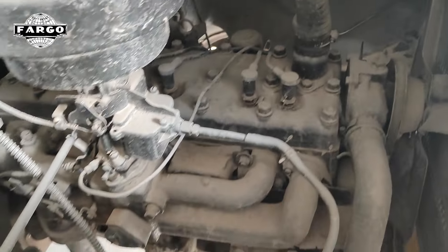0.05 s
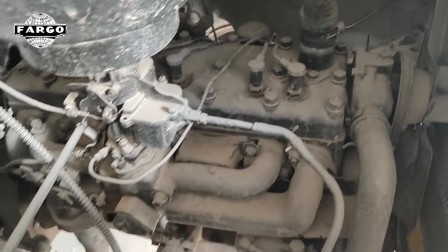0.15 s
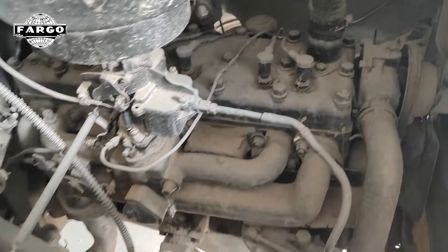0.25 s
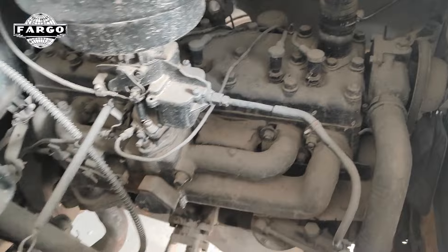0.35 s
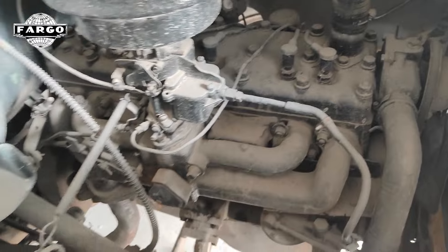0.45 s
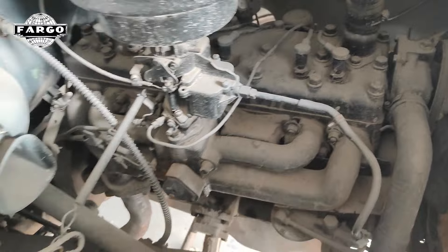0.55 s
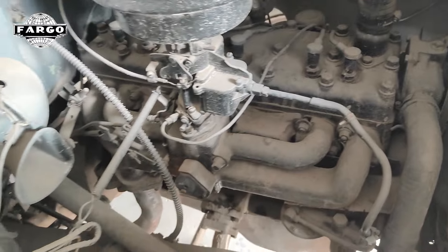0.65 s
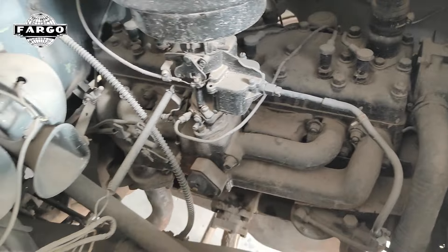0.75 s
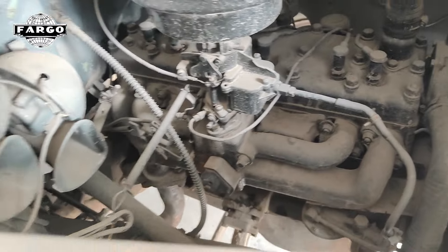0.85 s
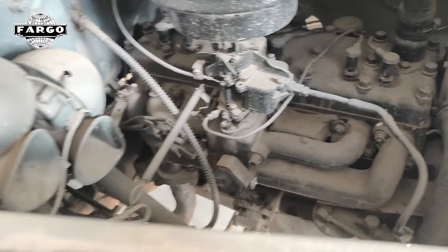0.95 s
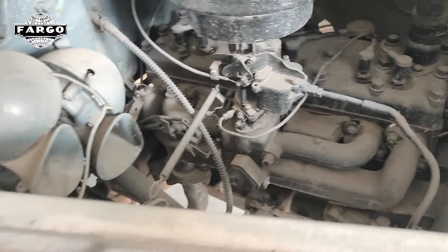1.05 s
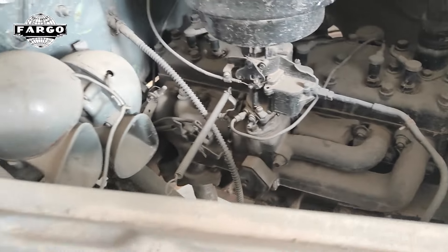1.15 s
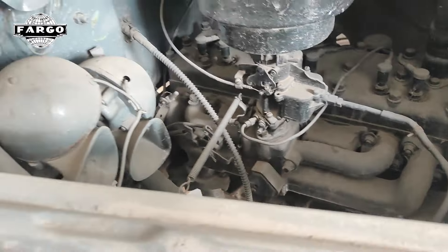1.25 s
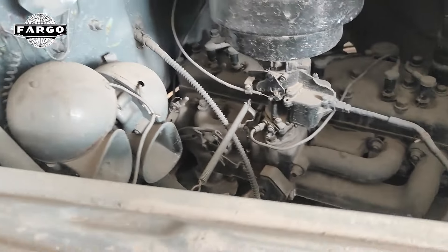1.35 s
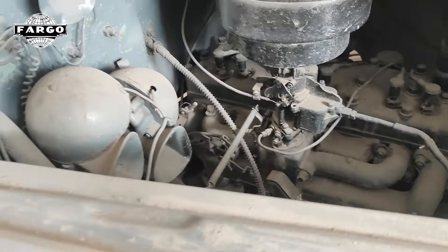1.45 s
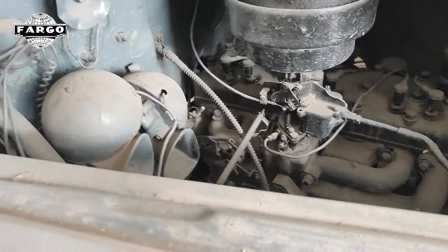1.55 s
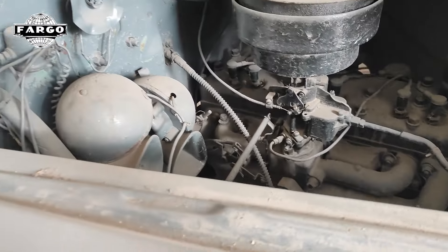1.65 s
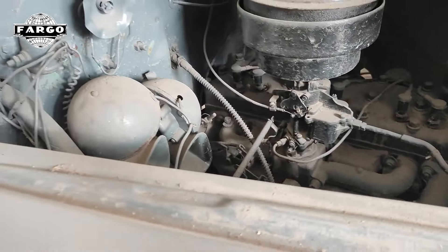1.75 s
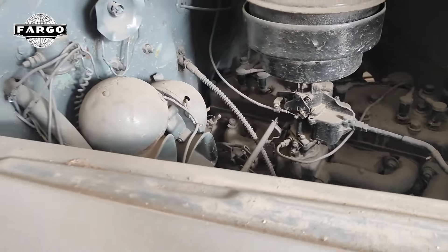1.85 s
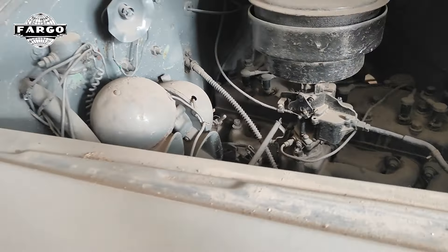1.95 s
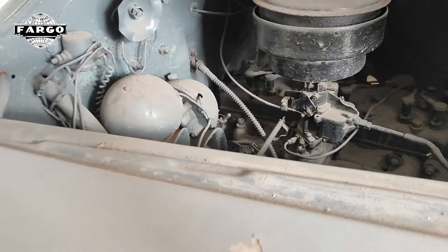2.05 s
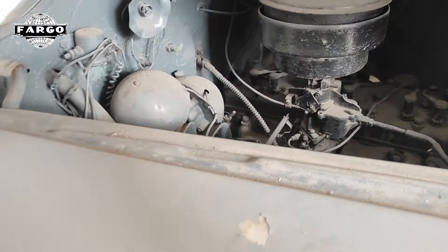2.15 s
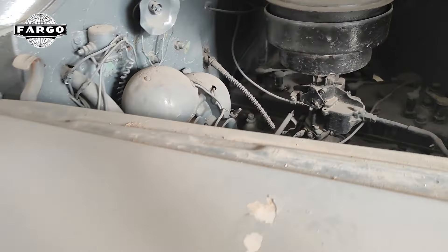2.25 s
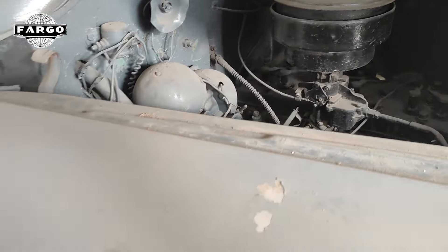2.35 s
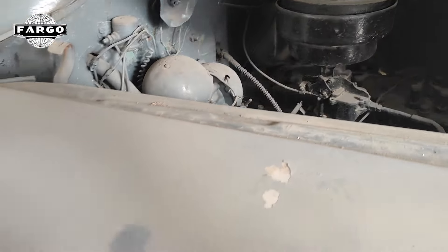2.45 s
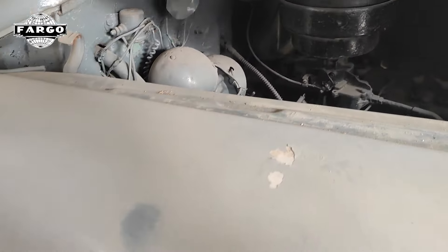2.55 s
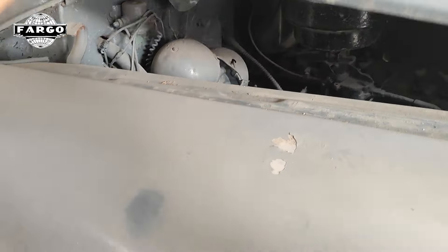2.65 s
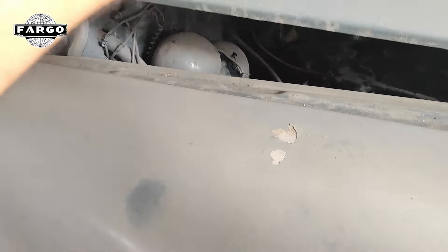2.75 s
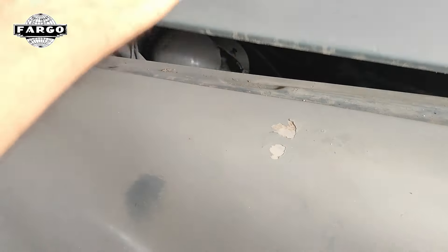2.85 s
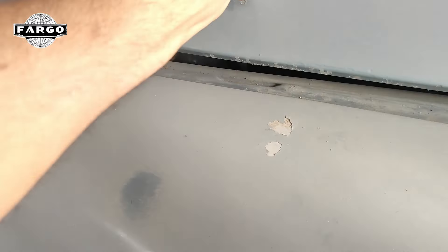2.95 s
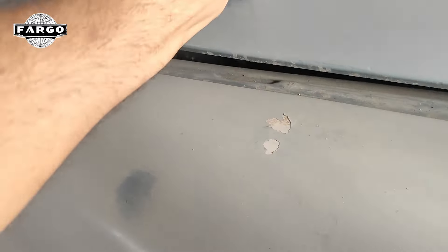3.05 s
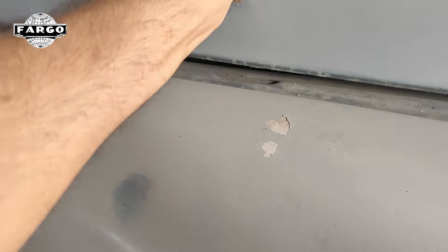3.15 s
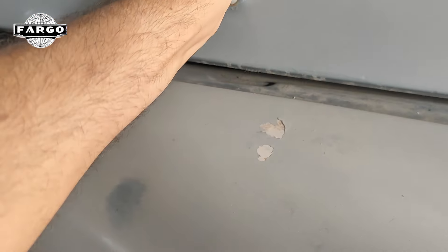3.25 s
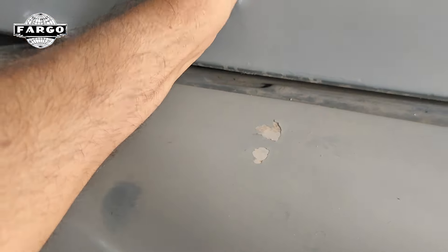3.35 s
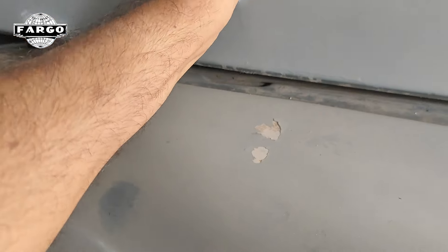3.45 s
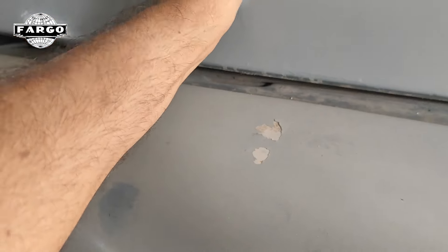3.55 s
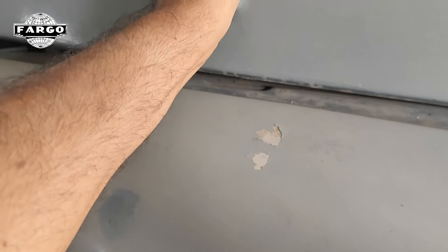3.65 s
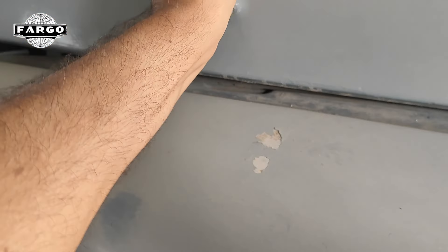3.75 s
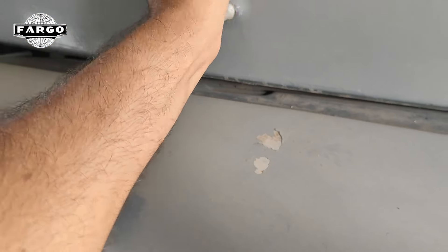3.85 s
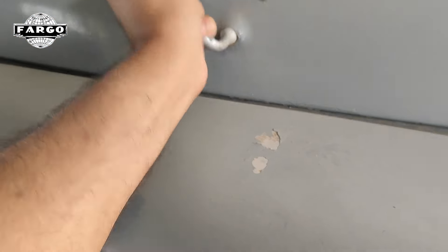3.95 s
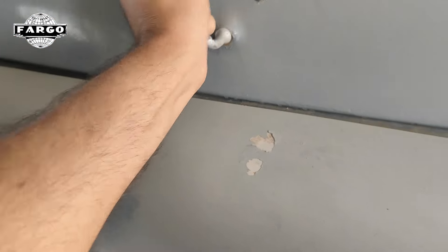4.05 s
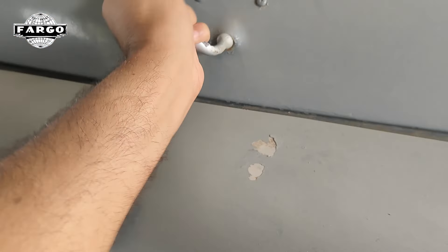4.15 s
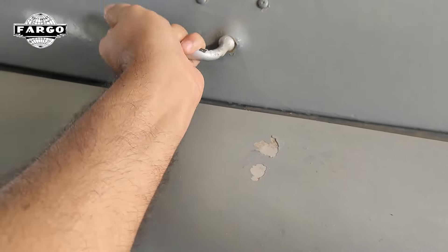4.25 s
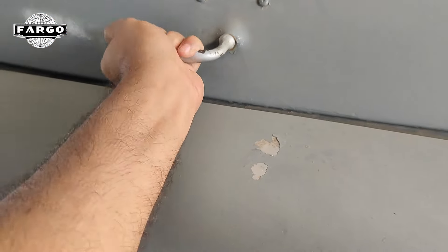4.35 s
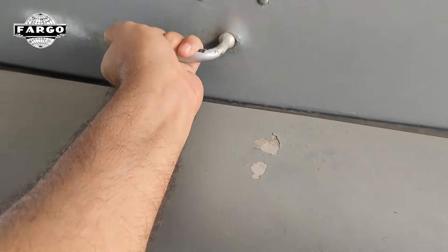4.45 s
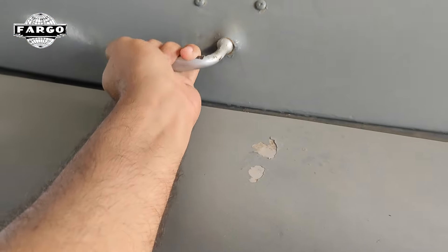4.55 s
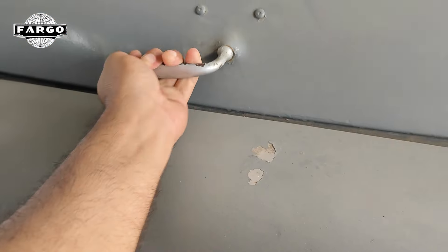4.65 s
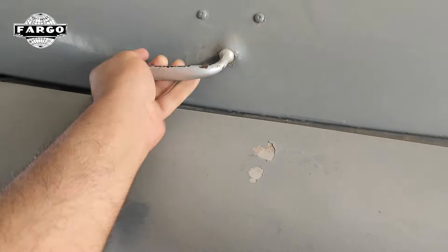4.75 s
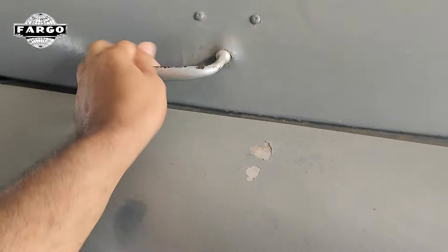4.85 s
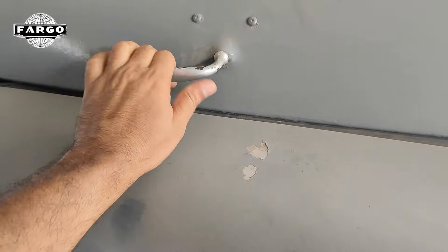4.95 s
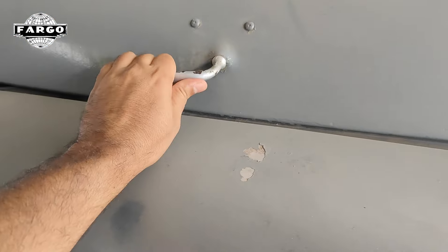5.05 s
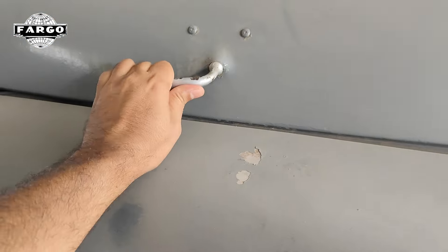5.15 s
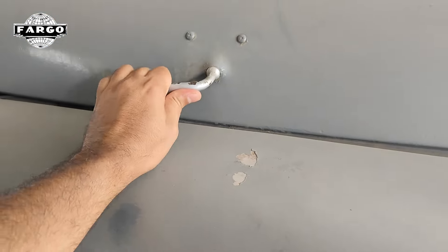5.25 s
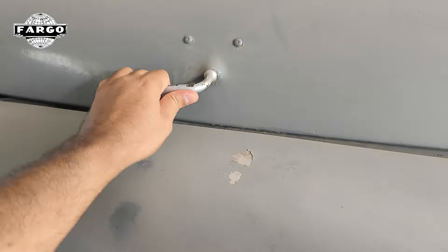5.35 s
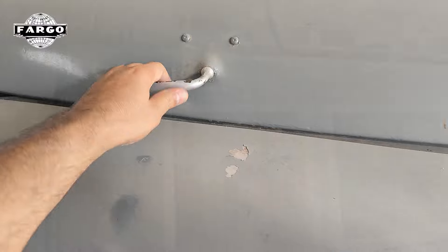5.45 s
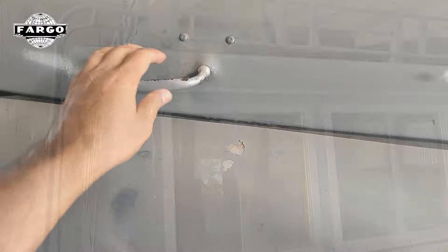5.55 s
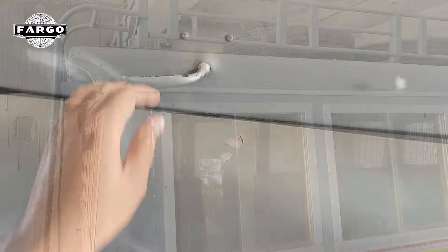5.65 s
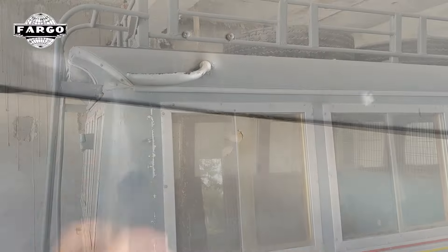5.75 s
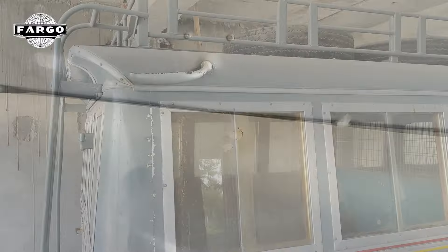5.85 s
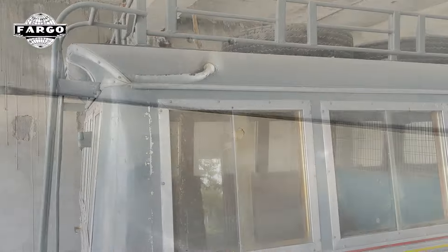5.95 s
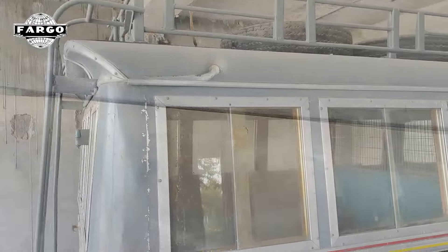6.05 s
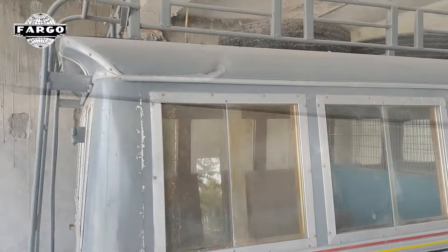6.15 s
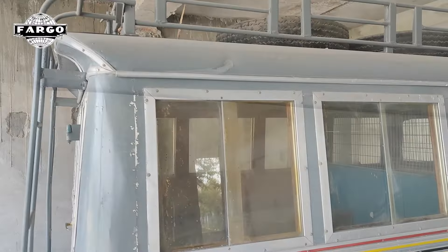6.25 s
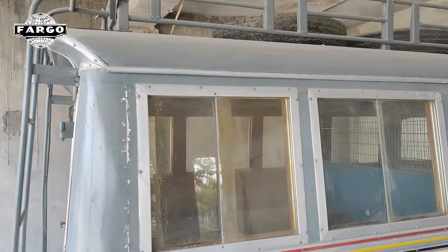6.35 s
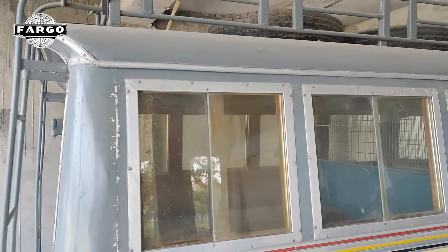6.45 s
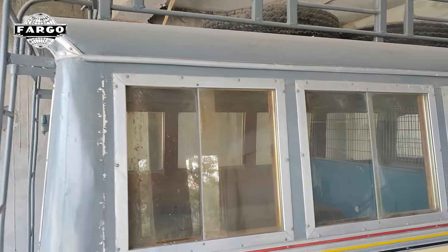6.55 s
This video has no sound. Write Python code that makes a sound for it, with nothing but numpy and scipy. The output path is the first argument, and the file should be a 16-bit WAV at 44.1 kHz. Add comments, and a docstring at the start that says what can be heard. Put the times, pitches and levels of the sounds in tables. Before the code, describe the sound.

Close stereo pickup of an old bus hood being shut by hand in an open yard. First, high wavering hinge squeaks over a distant low idle, then a short rough groan and scrape, a bright hard metal clash with hollow bonks, a pause, and a heavier slam with a deep panel boom. Small dull knocks come after the handle is released. The engine fades beneath thin far squeals, regular insect-like chirps and a faint twitter.

```python
"""An engine idles low some way off, as a few wavering harmonics under the shaped noise of an open yard.
Close by, two steel hood panels of an old bus are shut by hand. The side panel's dry hinge squeals and squeaks
in gliding friction tones and hiss, and grit ticks. The top panel scrapes down, crashes onto it and is slammed
home: chattering contact forces excite the many decaying modes of the sheet; the handle knocks as it is let go.
Late on come a thin far squeal, high chirps and a lower twitter, all of them phase-roughened tones."""
import sys
import numpy as np
from scipy import signal
from scipy.fft import rfft, irfft, next_fast_len
from scipy.io import wavfile

SR = 44100
rng = np.random.default_rng(int(sys.argv[2]) if len(sys.argv) > 2 else 0)


def dump_mix(stems):
    """Bounce the given channels to the path in sys.argv[1] as a 16-bit WAV at rate SR."""
    frames = np.atleast_2d(stems).T  # one column per channel
    limited = np.clip(frames, -1, 1)  # hard clip at full scale
    pcm = np.round(limited * 32767).astype(np.int16)
    wavfile.write(sys.argv[1], SR, pcm)


N = 290616
TIME = np.arange(N) / SR   # s

# Light knocks of panel and handle. Each row: start in seconds, relative level in dB.
KNOCKS = [(3.50, -33.5), (3.534, -38), (4.92, -30.5), (4.994, -29), (5.046, -36), (5.204, -31.5),
          (5.252, -41)]

# The top panel scrapes down, pressing harder and then lifting clear.
SCRAPE_S, SCRAPE_LENGTH_S, SCRAPE_ATTACK_S, SCRAPE_RELEASE_S = 2.565, 0.27, 0.11, 0.075
FADING, FADES_PER_S = 0.6, 100   # strength and rate of the echoes that make friction tones fade


def from_db(db):
    """Amplitude ratio from decibels: 20 dB is a factor of ten."""
    return 10 ** (np.asarray(db) / 20)


def rms_one(x):
    """Normalisation to unit root-mean-square value."""
    return x / np.sqrt(np.mean(x ** 2) + 1e-20)


def swell(rows):
    """Envelope interpolated in decibels from rows (s, .., dB); silent outside them."""
    rows = np.array(rows)
    return from_db(np.interp(TIME, rows[:, 0], rows[:, -1], left=-200, right=-200))


def held(s, length_s, attack_s, release_s, size=N):
    """Trapezoidal envelope: gain rises linearly, holds and falls back to silence."""
    t = TIME[:size]
    rise = (t - s) / attack_s
    fall = (s + length_s - t) / release_s
    return np.clip(np.minimum(rise, fall), 0, 1)


def at_hz(points, hz):
    """Spectrum read by interpolation on a logarithmic frequency axis."""
    points = np.array(points)
    return np.interp(np.log(hz), np.log(points[:, 0]), points[:, 1])


def drift(rate, size=N):
    """Slow random fluctuation of rms 1: random knots, rate of them a second, joined by lines."""
    knots = rng.standard_normal(size // 16)
    position = TIME[:size] * min(rate, 2000)
    return rms_one(np.interp(position, np.arange(len(knots)), knots))


def add(out, s, sound):
    """Superposition: mix a sound in from time s."""
    start = round(s * SR)
    out[..., start:start + sound.shape[-1]] += sound[..., :N - start]


def band_pass(order, band_hz):
    """Butterworth band-pass filter, flat within its band."""
    return signal.butter(order, band_hz, "band", fs=SR, output="sos")


def noise_bands(size):
    """Interaural correlation: yield (Hz, stereo noise) in 0.4-octave bands, the ears most alike in the bass."""
    # Each row: frequency in Hz, left-right correlation from -1 to 1.
    likeness = [(60, 0.98), (200, 1), (380, 0.88), (700, 0.61), (1300, 0.12), (2500, 0.31), (5000, -0.59),
                (15000, 0.46)]
    edges = np.geomspace(20, 17000, 25)
    white = rng.standard_normal((2, 2, size + 8000))
    for k, (low, high) in enumerate(zip(edges, edges[1:])):
        filtered = signal.sosfilt(band_pass(2, [low, high]), white[k % 2])
        mid, side = filtered[:, -size:]   # the filter has settled by then
        hz = np.sqrt(low * high)
        alike = np.clip(at_hz(likeness, hz), -1, 1)
        yield hz, np.sqrt(1 + alike) * mid + np.sqrt(1 - alike) * side * [[1], [-1]]


def tone(hz, rough, wander_rate, size=N):
    """Phase modulation: a friction tone of rms 1 wanders by rough radians; shifting echoes make it fade."""
    phase = 2 * np.pi * np.cumsum(hz + np.zeros(size)) / SR + rough * drift(wander_rate, size)
    direct = (1 + FADING * drift(FADES_PER_S, size)) * np.sin(phase)
    echo = FADING * drift(FADES_PER_S, size) * np.cos(phase)
    return rms_one(direct + echo)


def engine(unsteady=0.0129):
    """Harmonic series: low orders of the idling engine share one unsteady rate, each throbbing on its own."""
    # Each row: time in seconds, base frequency in Hz, level in dB.
    idle = [(0, 32.96, -29), (1.5, 34.58, -32.5), (2.1, 35.39, -30), (4.7, 35.74, -39), (6.59, 36.2, -51)]
    # Each row: multiple of the base frequency, relative level in dB.
    multiples = [(2, 0), (3, -13), (4, 2), (5, -10), (6, -4.5), (8, -13), (10, -11)]
    base_hz = np.interp(TIME, *np.transpose(idle)[:2])
    turns = np.cumsum(base_hz * (1 + unsteady * drift(13))) / SR
    harmonics = sum(from_db(db + 1.5 * drift(16)) * np.sin(2 * np.pi * (k * turns + rng.random()))
                    for k, db in multiples)
    return swell(idle) * rms_one(harmonics)


def yard(rumble_db=15.5, air_db=9.0, patchy_db=1.5):
    """Spectral shaping of noise: rumble of engine and street under a wash of outdoor air, on one envelope."""
    # Each row: time in seconds, level in dB to which each layer's own gain is added.
    background = [(0, -45), (2.6, -44.5), (3.8, -48), (4.7, -52.5), (5.5, -50.5), (6.05, -41.5), (6.6, -38)]
    # Each row of both: frequency in Hz, relative level in dB per Hz.
    rumble_shape = [(20, -4), (38, -8.5), (52, -4), (70, -1), (130, -0.5), (195, -5), (255, -12),
                    (330, -16), (500, -35.5)]
    air_shape = [(250, -37), (400, 1.5), (700, -0.5), (1100, -0.5), (1600, -3.5), (2400, 0), (3300, -14),
                 (4400, 4), (5500, -34.5), (6500, -17), (7800, -17), (10500, -16), (12500, -18.5),
                 (15500, -24)]
    rumble, air = 0, 0
    for hz, band in noise_bands(N):
        band = band * from_db(patchy_db * drift(14))
        rumble = rumble + band * from_db(at_hz(rumble_shape, hz)) * (hz < rumble_shape[-1][0])
        air = air + band * from_db(at_hz(air_shape, hz))
    return swell(background) * (from_db(rumble_db) * rms_one(rumble) + from_db(air_db) * rms_one(air))


def hinge(song_db=-3.5, squeak_db=-6.0, squeak_rise_s=0.00089, grit_db=-23.0, uneven_db=2):
    """Stick-slip friction: the dry hinge sings a gliding squeal and arching side notes, hisses and squeaks."""
    # Main squeal, following the speed of the swing.
    # Each row: time in seconds, frequency in Hz, relative level in dB.
    squeal = [(1.46, 8300, -55), (1.52, 8130, -35), (1.66, 8210, -32), (1.80, 8186, -33.5),
              (1.88, 8100, -29.5), (1.97, 8170, -32.5), (2.1, 8350, -26.5), (2.24, 8460, -29.5),
              (2.32, 8467, -28), (2.55, 8430, -34.5), (2.62, 8330, -23.5), (2.68, 8180, -25),
              (2.87, 8260, -50)]
    # Side notes. Each row: start in seconds, length in seconds, top frequency in Hz, sag at the ends in Hz,
    # relative level in dB, roughness in radians.
    side_notes = [(1.05, 0.56, 3540, 24, -48.5, 0.25), (1.192, 0.55, 8520, 70, -32.5, 0.9),
                  (1.202, 0.56, 6770, 50, -47.5, 1), (1.727, .22, 6770, 22, -48.5, 1),
                  (1.366, 0.34, 8470, 24, -27, 1.1), (1.658, 0.39, 8580, 60, -32.5, 1.3),
                  (1.80, .2, 8870, 20, -39, .8), (2.05, 0.24, 8870, 20, -39, .8),
                  (2.034, 0.65, 9590, 100, -31, .9), (2.19, 0.33, 4810, 26, -46, 0.7),
                  (2.176, .42, 11200, 80, -51, .9), (2.256, .26, 9040, 50, -42, 0.7),
                  (2.46, .18, 8880, 40, -38, .9)]
    # Short squeaks where the hinge catches.
    # Each row: start in seconds, frequency in Hz, relative level in dB, 60 dB decay time in seconds.
    squeak_rows = [(.37, 3750, -35, .08), (.832, 12700, -32, 0.18), (0.866, 4280, -32.5, 0.12),
                   (1.1, 12670, -14, 0.054), (1.39, 12700, -25, .13), (1.49, 12800, -34, .08),
                   (1.535, 4320, -37, 0.2), (1.655, 4230, -35, 0.22), (1.70, 12700, -28, 0.39),
                   (1.807, 4300, -27, 0.2), (1.878, 12700, -33, .1)]
    wavers_per_s, squeal_rough = 130, 1.0   # roughness in radians
    attack_s, release_s = 0.054, 0.11
    tail_db, tail_t60_s = -22, 0.94   # the engine bay rings on after each squeak

    t = TIME[:SR]
    rubbing = swell(squeal)
    song = rubbing * tone(np.interp(TIME, *np.transpose(squeal)[:2]), squeal_rough, wavers_per_s)
    for s, length_s, hz, sag_hz, db, rough in side_notes:
        gain = from_db(db + uneven_db * drift(12.9, SR)) * held(0, length_s, attack_s, release_s, SR)
        off_centre = np.clip(2 * t / length_s - 1, -1, 1)
        add(song, s, gain * tone(hz - sag_hz * off_centre ** 2, rough, wavers_per_s, SR))
        add(rubbing, s, gain)

    hiss = signal.sosfilt(band_pass(2, [6500, 11000]), rng.standard_normal((2, N)))
    grit = rubbing * rms_one(hiss * from_db(2 * drift(84)))

    squeaks = np.zeros(N)
    for s, hz, db, t60 in squeak_rows:
        dying = from_db(-60 * t / t60) + from_db(tail_db - 60 * t / tail_t60_s)
        onset = 1 - np.exp(-t / squeak_rise_s)
        add(squeaks, s, from_db(db) * dying * onset * tone(hz, rough=1.2, wander_rate=470, size=SR))
    return from_db(song_db) * song + from_db(grit_db) * grit + from_db(squeak_db) * squeaks


def ticks(t60_s=0.092):
    """Exponential decay: grit cracks in the hinge, then under the scraping panel, as brief bright noise."""
    # Each row: start in seconds, relative level in dB.
    cracks = [(.868, -32.5), (1.03, -39), (1.668, -37), (1.682, -32), (1.81, -40), (1.83, -37), (2.2, -39),
              (2.44, -45), (2.595, -38), (2.642, -33), (2.664, -28)]
    out, t = np.zeros((2, N)), TIME[:SR // 5]
    bright = band_pass(2, [2200, 9900])
    for s, db in cracks:
        burst = rng.standard_normal((2, len(t))) * from_db(db - 60 * t / t60_s)
        add(out, s, signal.sosfilt(bright, burst))
    return out


def coloured(force, levels_db):
    """Filter bank: weight the seven registers of a contact force."""
    # Borders in Hz between thump, body, clang, ring, clash, sizzle and spit.
    borders_hz = [176, 480, 1247, 2050, 4630, 10000]
    middle = [(pair, "band") for pair in zip(borders_hz, borders_hz[1:])]
    shapes = [(borders_hz[0], "low"), *middle, (borders_hz[-1], "high")]
    out = 0
    for db, (hz, kind) in zip(levels_db, shapes):
        register = signal.butter(3, hz, kind, fs=SR, output="sos")
        out = out + from_db(db) * signal.sosfilt(register, force + 1e-18)
    return out


def scrape_force(slip_rate=5000, rasp_db=-19.8, rub_db=-21.5):
    """Dry friction as dense random slips: a rasp while the panel presses, over a longer dull rub."""
    # Seven relative levels in dB, from thump to spit.
    rasp_colour = [-13, -2.5, 2, 0.5, -5, -4.5, -16]
    slipping = rng.random((2, SR)) < slip_rate / SR
    slips = slipping * rng.choice([-1, 1], (2, SR)) / np.sqrt(slip_rate / 20)
    pressure = held(0, SCRAPE_LENGTH_S, SCRAPE_ATTACK_S, SCRAPE_RELEASE_S, SR)
    rasp = coloured(slips[0] * pressure, rasp_colour)
    rub = signal.sosfilt(band_pass(2, [290, 610]), slips[1]) * held(0, 0.34, 0.044, 0.04, SR)
    out = np.zeros(N)
    add(out, SCRAPE_S, from_db(rasp_db) * rasp)
    add(out, 2.55, from_db(rub_db) * rub)   # the rub sets in first
    return out


def judder(lag_s=0.025, rough=0.86):
    """Near-periodic stick-slip: the scraping edge groans just behind the pressure, sinking as it slows."""
    # Each row: multiple of the groan's frequency, level in dB.
    multiples = [(1, -24), (2, -32.5)]
    start_hz, sag_hz_per_s = 359, 94.6
    hz = start_hz - sag_hz_per_s * np.clip(TIME - SCRAPE_S, 0, SCRAPE_LENGTH_S)
    pressure = held(SCRAPE_S + lag_s, SCRAPE_LENGTH_S, SCRAPE_ATTACK_S, SCRAPE_RELEASE_S)
    return pressure * sum(from_db(db) * tone(k * hz, rough, wander_rate=110) for k, db in multiples)


def contacts():
    """Contact spectra as rows (s, chatter s, seven dB): weight lifts the low registers, hardness the high."""
    # Panel meets panel, each slam landing in several contacts.
    # Each row: start in seconds, relative level in dB, chatter decay in seconds, weight in dB, hardness in dB.
    blow_rows = [(2.589, -20.5, 0.0046, 3.5, -9), (2.657, -21, 0.0025, -1, -1.5),
                 (2.894, -15, .004, -10, -5), (2.898, -10, 0.031, -23, -2),
                 (2.916, -10.5, 0.0053, -15, 6.5), (2.937, -11, 0.0085, -8, -3),
                 (2.955, -5.5, 0.007, -10.5, -0.5), (2.988, -14.5, 0.018, -5, 2),
                 (3.047, -22, 0.0018, 0, 12), (3.073, -10.5, 0.0022, 0.5, -27), (3.097, -26, 0.027, 5, -6),
                 (3.135, -34, 0.013, 2, -19), (3.933, -23.5, 0.0051, 5.5, -9), (4.017, -16, 0.0044, 5, -7),
                 (4.022, -10.5, 0.0058, -2, -0.5), (4.029, -15.5, 0.012, -4, 20),
                 (4.056, -10.5, 0.015, 4.5, 3), (4.087, -19.5, 0.011, 10.5, 16.5),
                 (4.104, -10.5, 0.0067, 2, 7), (4.135, -18, 0.0072, -10, 0), (4.163, -28, 0.0084, 12.5, 6),
                 (4.218, -31, 0.0076, -7, 3)]
    knock_colour, knock_chatter_s = np.array([-13, -0.5, -2.5, -19, -15, -20, -24]), 0.0016   # dB
    rows = []
    for s, db, chatter_s, weight, hard in blow_rows:
        thump = db - 4 + weight
        body = db + 1.5 + 0.62 * weight
        clang = db
        ring = db + 0.5 - 0.21 * weight   # a heavy blow smothers the ring
        clash = db - 2.5 + 0.6 * hard
        sizzle = db + hard
        spit = db - 9.5 + 1.52 * hard
        rows.append((s, chatter_s, thump, body, clang, ring, clash, sizzle, spit))
    return rows + [(s, knock_chatter_s, *(db + knock_colour)) for s, db in KNOCKS]


def blow_force(blows, chatter_rate=1500, first_touch=3.3):
    """Repeated impact: each contact is a first touch followed by a dying chatter of edge on edge."""
    out, t = np.zeros(N), TIME[:SR // 5]
    for s, chatter_s, *levels_db in blows:
        touching = rng.random(len(t)) < chatter_rate / SR
        taps = touching * rng.standard_normal(len(t)) * np.exp(-t / chatter_s)
        taps[0] = first_touch
        add(out, s, coloured(taps / np.linalg.norm(taps), levels_db))
    return out


def ringing(modes, rise_s=0.002):
    """Modal synthesis: one second of decaying sines, the higher ones reaching the two ears out of step."""
    t = TIME[:SR]
    rings = 0
    for hz, db, t60 in modes:
        ear_phase = min(hz / 1500, 1) * rng.uniform(-1.6, 1.45, (2, 1))
        rings = rings + from_db(db - 60 * t / t60) * np.sin(2 * np.pi * hz * t + ear_phase)
    return (1 - np.exp(-t / rise_s)) * rings


def sheet_response(modes_db=-4.5, spread_s=0.00084, crack=1.7, crack_s=0.011):
    """Impulse response of a plate tapped at one spot: a dense crowd of modes and a few strong ones."""
    # The crowd. Each row: frequency in Hz, relative level in dB per Hz.
    crowd_shape = [(30, -9), (90, 6), (180, -6.5), (320, -2), (420, -9), (720, -5), (1000, -7), (1400, -7),
                   (1750, -15), (2400, -14), (3000, -6.5), (3900, -12.5), (5500, -30), (11000, -22),
                   (15500, -25)]
    # Each row: frequency in Hz, 60 dB decay time in seconds.
    crowd_t60 = [(60, 0.58), (150, 0.85), (400, 0.77), (1000, 0.47), (2500, 0.43), (4000, 0.37),
                 (5500, 0.24), (10000, 0.25), (15000, 0.068)]
    # Modes that stand out. Each row: frequency in Hz, relative level in dB, 60 dB decay time in seconds.
    strong_modes = [(90.7, -9, 1), (140.5, -7.5, 0.81), (228, -18.5, 0.22), (322, -17, 0.71),
                    (474.3, -13, 0.52), (601, -12, 0.41), (698, -18, 0.43), (846, -11, 0.19),
                    (974, -23, 0.25), (1012, -13, 0.68), (1193, -17, 0.36), (1340, -28, 0.6),
                    (1550, -18, 0.33), (2107, -20, 0.47), (2210, -23, 0.4), (2420, -11, .25),
                    (2450, -6, 0.17), (2570, -10, 0.17), (3460, -6, 0.31)]
    t = TIME[:SR]
    crowd = 0
    for hz, band in noise_bands(SR):
        decay = from_db(at_hz(crowd_shape, hz) - 60 * t / at_hz(crowd_t60, hz))
        # the struck edge cracks before the sheet takes over
        edge_crack = 1 + crack * min(hz / 4000, 1) * np.exp(-t / crack_s)
        crowd = crowd + band * decay * edge_crack
    crowd = crowd / np.std(crowd[:, :SR // 20])
    spreading = 1 - np.exp(-t / spread_s)   # bending waves take a moment to fill the panel
    return spreading * (crowd + from_db(modes_db) * ringing(strong_modes))


def hood(count=3):
    """Convolution of force with plate response at several spots, plus the modes of rim, seat, catch and panel."""
    # Each row of the strikes: start in seconds, relative level in dB.
    # Each row of the modes: frequency in Hz, relative level in dB, 60 dB decay time in seconds.
    # The stiff rim lands and bounces.
    rim_strikes = [(2.897, -2), (2.921, -14), (2.957, -15)]
    rim_modes = [(882, -2.5, 0.066), (1480, -3, 0.1), (1870, -22, 0.25), (2180, -5, 0.079),
                 (2245, 1.5, 0.067), (3050, -5, 0.11), (3630, -0.5, 0.05), (3690, 0, 0.073),
                 (4350, -7, 0.08)]
    # The top panel drops into its seat with a clank.
    seat_strikes = [(3.074, -12.5)]
    seat_modes = [(839, 2.5, 0.16), (955, -3, 0.27), (1340, -12, 0.36), (1470, -11.5, 0.28),
                  (2280, -13, .27), (2530, -13, 0.21)]
    # The steel catch is grazed, then snaps in, rings and settles.
    catch_strikes = [(2.934, -11), (4.048, -10), (4.215, -35)]
    catch_modes = [(2435, 1, 0.19), (2579, 4, 0.15), (2745, -4, 0.092), (3550, 2.5, 0.079),
                   (4310, -3, 0.13)]
    # The whole panel bulges and booms.
    flexes = [(3.01, -28), (3.076, -25), (4.022, -33), (4.113, -12.5), (4.165, -21)]
    flex_modes = [(48, -6, 0.09), (92.3, 8, 0.35), (106.8, 7, 0.23), (142.4, 2, 0.34)]
    # The sheet around the handle.
    knock_modes = [(540, -11, 0.072), (667, -4.5, 0.11), (835, -6, 0.075), (1014, -9, .07),
                   (1185, -10, .07)]
    # A patch of sheet buckles with a hollow bonk.
    # Each row: start in seconds, frequency in Hz, level in dB, 60 dB decay time in seconds.
    pops = [(2.961, 332, -8.5, 0.2), (2.976, 247, -10, 0.17), (3.003, 162, -16.5, 0.38),
            (3.052, 526, -20, 0.16), (3.076, 207, -11, .2), (3.936, 303, -27, 0.24),
            (3.933, 222, -18, 0.13), (4.02, 137, -10.5, 0.36), (4.056, 227, -8, 0.17),
            (4.095, 520, -12, .12), (4.104, 330.6, -20, 0.43)]

    out = np.zeros((2, N))
    for spot in range(count):
        force = blow_force(contacts()[spot::count]) + scrape_force()
        out += signal.oaconvolve(force[None], sheet_response(), axes=1)[:, :N]
    struck_parts = ((rim_strikes, rim_modes), (seat_strikes, seat_modes), (catch_strikes, catch_modes),
                    (flexes, flex_modes), (KNOCKS, knock_modes))
    for strikes, modes in struck_parts:
        for s, db in strikes:
            add(out, s, from_db(db) * ringing(modes))
    for s, *mode in pops:
        add(out, s, ringing([mode]))
    return out


def far_squeal():
    """Amplitude and phase modulation: thin far tones pulse alike at both ears; their phases partly differ."""
    # Level of the upper tones, which dips and fades. Each row: time in seconds, level in dB.
    upper_level = [(4.63, -73), (4.69, -44), (4.862, -41.5), (4.896, -63), (4.95, -52), (5.0, -42),
                   (5.05, -50), (5.346, -45), (5.40, -47.5), (5.52, -49), (5.625, -62), (5.698, -43),
                   (5.83, -58), (5.99, -49.5), (6.2, -62)]
    # Each row: frequency in Hz, level in dB relative to that of the upper tones.
    upper_tones = [(3448, 0.5), (3887, -17), (9560, -23), (9900, -24)]
    # Level of the lower tone. Each row: time in seconds, level in dB.
    lower_level = [(4.64, -68), (4.675, -50), (4.725, -51), (4.76, -69), (4.86, -59), (4.89, -53),
                   (4.96, -57), (5.03, -67), (5.14, -54), (5.25, -59), (5.34, -47), (5.42, -61),
                   (5.56, -55), (5.66, -60), (5.74, -49), (5.8, -58), (5.87, -51), (6.05, -55)]
    lower_hz = 3026
    stutter_s, stutter_length_s, stutter_per_s, stutter_depth = 5.0, 0.42, 15.5, 0.7

    stutter_phase = np.pi * stutter_per_s * (TIME - stutter_s) + 0.6 * drift(12)
    stuttering = (TIME > stutter_s) * (TIME < stutter_s + stutter_length_s)
    upper = swell(upper_level) * (1 - stutter_depth * np.sin(stutter_phase) ** 4 * stuttering)
    voices = [(hz, from_db(db) * upper) for hz, db in upper_tones] + [(lower_hz, swell(lower_level))]
    out = 0
    for hz, gain in voices:
        wander = 0.4 * drift(60) + 0.6 * np.array([drift(25), drift(25)])   # shared part, then each ear's own
        flutter = np.abs(1 + 0.2 * drift(40))
        out = out + gain * flutter * np.sqrt(2) * np.sin(2 * np.pi * hz * TIME + wander)
    return out


def chirps(length_s=0.039):
    """Gaussian pulses: a run of faint raspy chirps in the yard, their pitch varying slightly around 8300 Hz."""
    # Each row: time of the peak in seconds, frequency in Hz, level in dB.
    rows = [(5.679, 8300, -53), (5.80, 8300, -48), (5.925, 8330, -43), (6.054, 8280, -42),
            (6.163, 8300, -41), (6.285, 8200, -41.5), (6.405, 8350, -40), (6.529, 8220, -38.5)]
    beats = sum(from_db(db) * np.exp(-((TIME - s) / length_s) ** 2) for s, hz, db in rows)
    return beats * tone(np.interp(TIME, *np.transpose(rows)[:2]), rough=1.4, wander_rate=560)


def twitter(start_s=6.29, length_s=0.38, fade_s=0.062, hz=4600, level_db=-41):
    """Deep random phase modulation: a faint, very raspy twitter, lower than the chirps."""
    rasp = tone(hz, rough=1.7, wander_rate=700)
    return from_db(level_db) * held(start_s, length_s, fade_s, fade_s) * rasp


def scene(ear_lag_s=0.00037, shade_depth=0.52):
    """Interaural delay: engine and yard reach the left ear first, a little shaded; the hood is close by."""
    left, right = engine() + yard()
    shaded_band = signal.sosfilt(band_pass(1, [1140, 3200]), left)
    left = left - shade_depth * shaded_band
    right = np.interp(TIME - ear_lag_s, TIME, right)
    surroundings = np.array([left, right])
    panels = hinge() + ticks() + judder() + hood()
    return surroundings + panels + far_squeal() + chirps() + twitter()


def record(dry, ceiling=0.85, cutoff_hz=15600):
    """Saturation and linear filtering: peaks are rounded, each microphone port colours its side, the top is cut."""
    # Left port, with a deep trough in the treble, then right. Each row: frequency in Hz, gain in dB.
    ports = [
        [(1000, -1.5), (1900, -1.05), (5000, -5), (6400, 6), (7500, -3.5), (8200, -12.5), (8700, -18),
         (9400, -29), (10200, -22), (11200, -33), (13000, -17), (15500, -22)],
        [(1000, -1.5), (1900, -1.65), (5000, -3.5), (6000, -6), (6900, -9), (7800, -1), (8500, 0), (11000, -5),
         (13000, -7.5), (15500, -12)],
    ]
    size = next_fast_len(N + 4096)
    hz = np.maximum(np.fft.rfftfreq(size, 1 / SR), 1)
    rounded = ceiling * np.tanh(dry / ceiling)
    port_gain = from_db([at_hz(port, hz) for port in ports])
    heard = irfft(rfft(rounded, size) * port_gain, size)[:, :N]
    return signal.sosfilt(signal.ellip(10, 0.1, 80, cutoff_hz, fs=SR, output="sos"), heard)


dry = scene()
out = record(dry)
dump_mix(out)
```